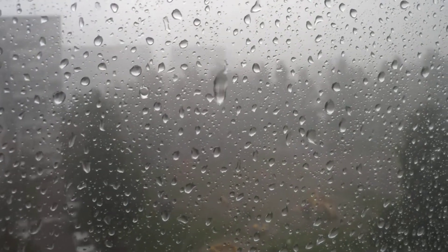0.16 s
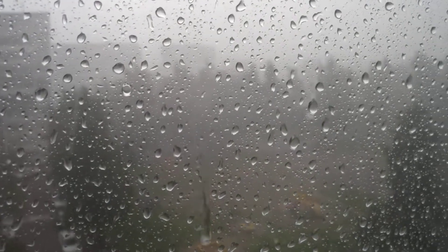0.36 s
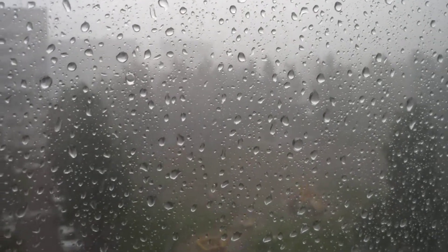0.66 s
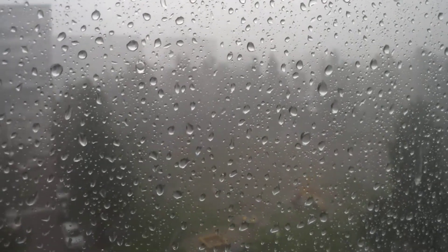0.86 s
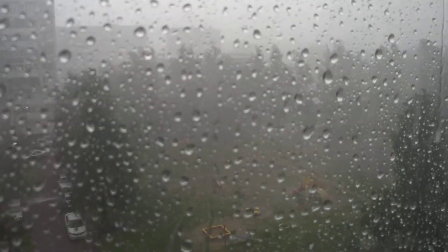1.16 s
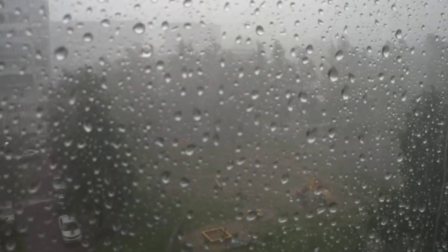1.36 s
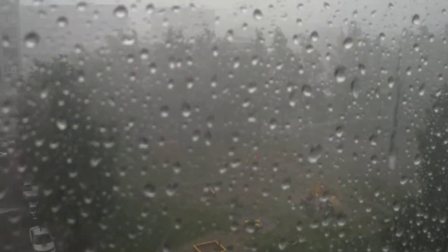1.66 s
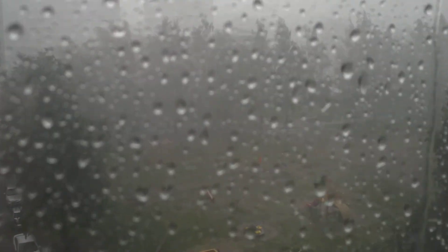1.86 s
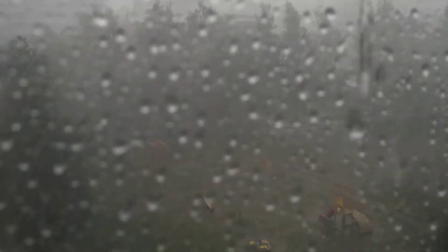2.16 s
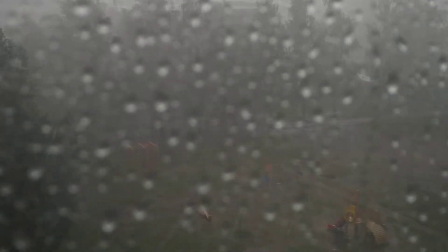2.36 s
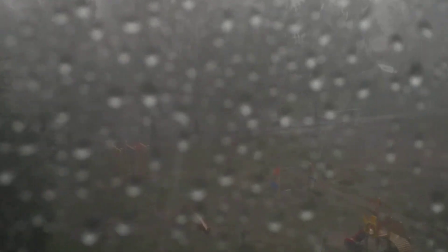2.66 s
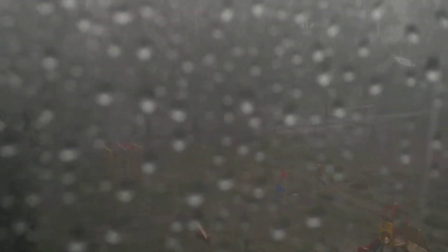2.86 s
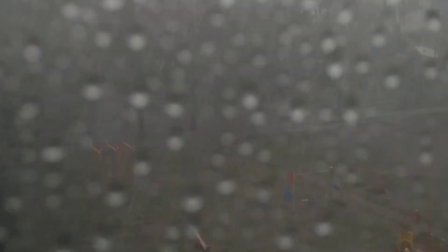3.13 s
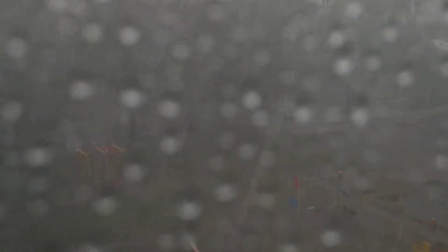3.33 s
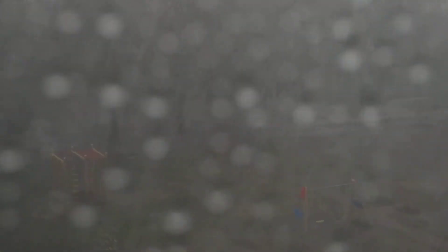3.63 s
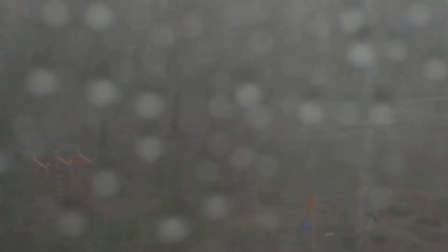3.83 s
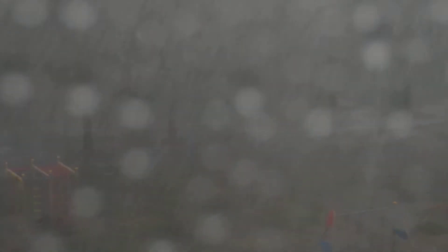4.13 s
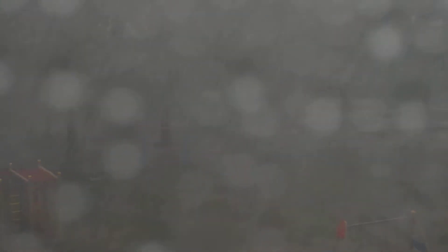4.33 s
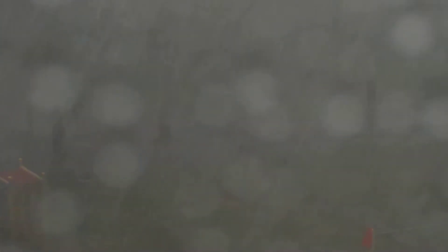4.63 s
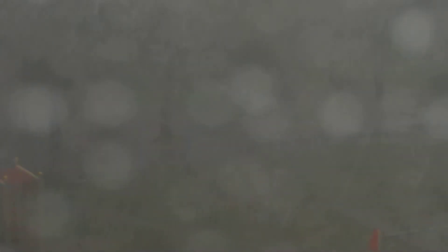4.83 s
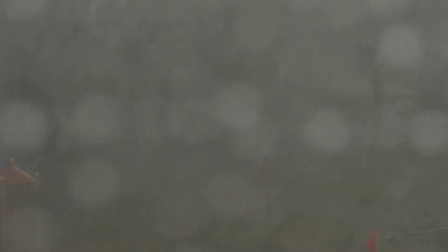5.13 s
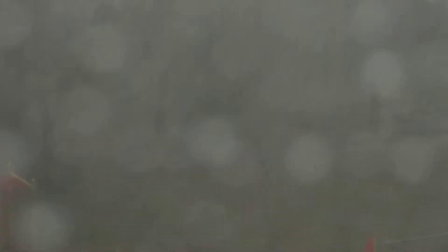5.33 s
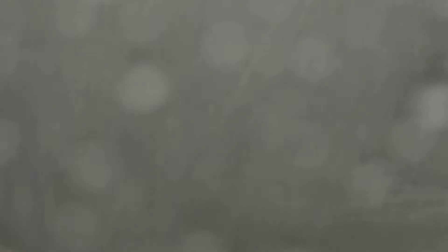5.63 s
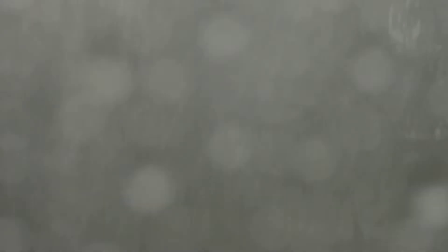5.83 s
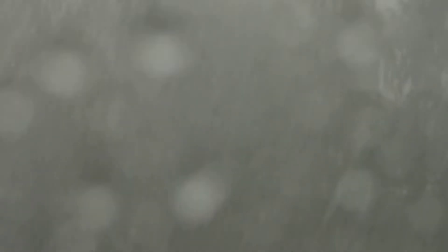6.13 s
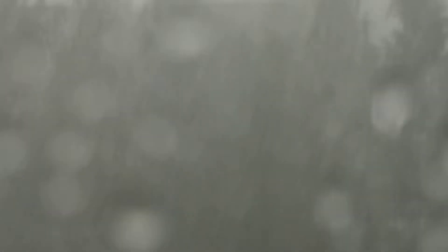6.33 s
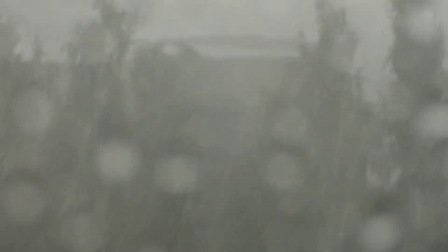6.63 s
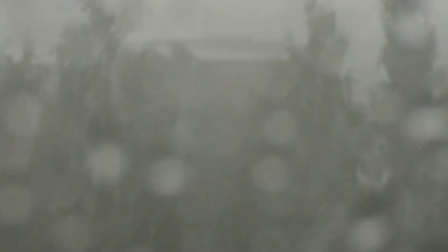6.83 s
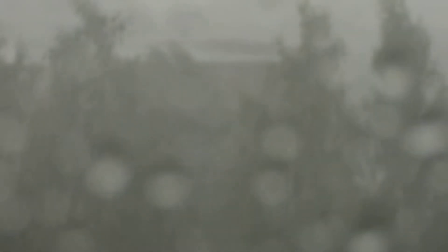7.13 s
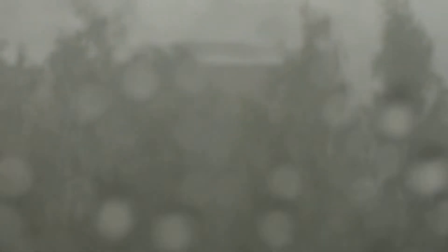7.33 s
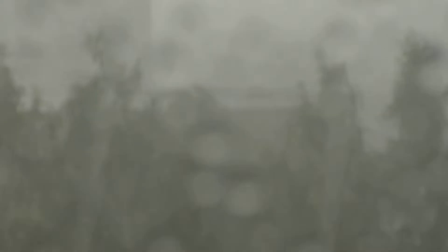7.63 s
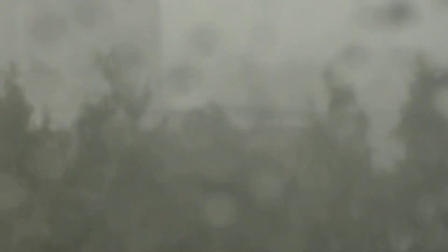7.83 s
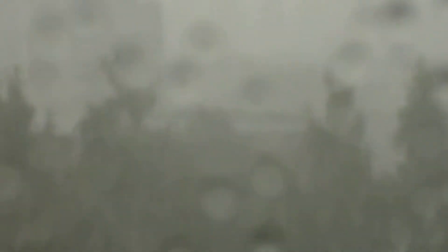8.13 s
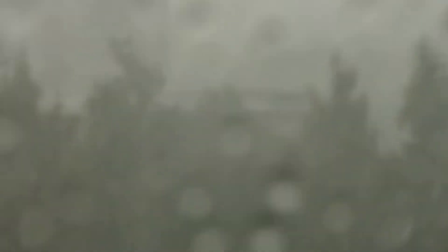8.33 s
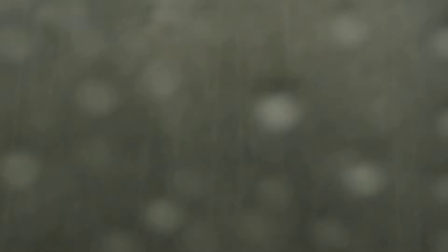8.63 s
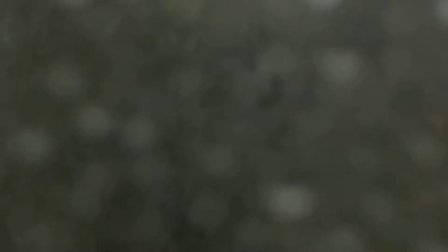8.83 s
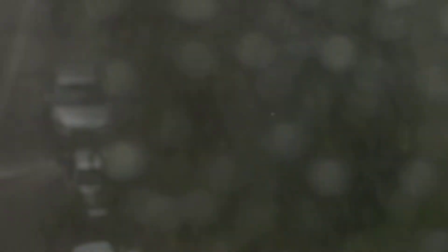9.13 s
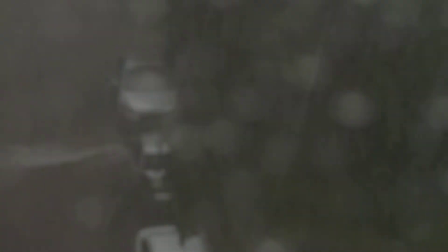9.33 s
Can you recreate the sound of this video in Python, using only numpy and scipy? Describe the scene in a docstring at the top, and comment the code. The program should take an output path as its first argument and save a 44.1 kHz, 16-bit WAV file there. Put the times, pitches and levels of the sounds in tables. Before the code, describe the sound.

Close indoor view of a storm through a closed window. A few dry hard clicks sit beside the microphone at the start, then heavy drops drum on the metal sill, growing denser. Hailstones tick and crack on the glass, two very hard ones just after three seconds rattling the pane. Downpour hiss and low rumble stay behind.

```python
"""Heavy drops and gusty patter drum on a metal sill below a closed window, each exciting its modes.
Hailstones crack on the glass as noise bursts through its resonances; blows make the pane boom and rattle.
Behind lie the hiss of the downpour and a low rumble, both coloured noise, and the hum of the pane.
Dry clicks sound beside the microphone early on; the level dips briefly around them.
The stereo image narrows to mono for a few seconds, then partly reopens."""
import sys
import numpy as np
from scipy import signal
from scipy.fft import rfft, irfft
from scipy.io import wavfile
from scipy.ndimage import uniform_filter1d

SR = 44100
rng = np.random.default_rng(int(sys.argv[2]) if len(sys.argv) > 2 else 0)


def write(x):
    x = np.atleast_2d(x).T
    wavfile.write(sys.argv[1], SR, np.round(np.clip(x, -1, 1) * 32767).astype(np.int16))


N = 418068
TIME = np.arange(N) / SR
ROOM_T60_S = 0.28

# All levels in the tables are relative; each source sets its own overall gain.
# drive of the gusts on the rain: [t/s, level/dB]
GUSTS = [(0.0, -42), (0.29, -45), (0.5, -54.5), (0.8, -62), (1.15, -60), (1.45, -44.5), (2.25, -53),
         (2.53, -40.5), (2.93, -54), (3.3, -48.5), (3.7, -43), (4.3, -46.5), (4.8, -43), (5.15, -46),
         (5.4, -39), (5.8, -42.5), (6.1, -47.5), (6.5, -45.5), (7.45, -41.5), (7.8, -48.5), (8.3, -35.5),
         (8.55, -41.5), (8.95, -35.5), (9.28, -45.5), (9.48, -34)]
# strength of the downpour: [t/s, level/dB]
RAINFALL = [(0.0, -68.5), (0.31, -60), (0.43, -57), (0.55, -80), (0.62, -73), (0.87, -69), (1.1, -63),
            (1.3, -56), (2.61, -53.5), (2.77, -55.5), (4.33, -52), (5.25, -58), (5.76, -57), (6.42, -59),
            (7.34, -56.5), (7.66, -60), (8.08, -57), (8.21, -55.5), (9.48, -59)]
# loudest hailstones on the glass: [t/s, level/dB, treble/dB]
HAIL_STRIKES = [(0.752, -45, -35), (0.966, -44.5, -4), (1.244, -55, 4), (1.367, -37, -7),
                (1.893, -45.5, -4.5), (2.3186, -34.5, -11), (2.3908, -35, -19), (2.409, -38, -17),
                (2.4259, -37, -14), (2.505, -43, -4.5), (2.556, -40.5, -13), (2.568, -46, -15),
                (2.582, -34, -27), (2.635, -29, -26), (2.677, -37, -17), (2.876, -53, 3),
                (3.2964, -16.5, -18), (3.3275, -13.5, -18), (3.6353, -41, -6), (3.954, -35.5, -6.5),
                (3.999, -38, -7.5), (4.031, -38, -5), (4.0926, -43, 0.5), (4.339, -48, -13),
                (4.38, -35.5, -14), (4.429, -37, -17), (4.5, -36.5, -26), (4.594, -32.5, -21),
                (4.606, -36, -13), (4.645, -45.5, -6), (4.877, -37, -6), (5.711, -34, -16),
                (5.848, -20, -14.5), (5.963, -26.5, -8), (6.123, -51, -1.5), (6.166, -39, -18),
                (6.302, -40, -20), (6.751, -37.5, -9), (7.02, -34.5, -23), (7.116, -30, -21),
                (7.2464, -34.5, -12), (7.2993, -52, 11), (8.025, -50.5, 1), (8.115, -32.5, -15),
                (8.139, -42, -7), (8.193, -38.5, -5), (8.2785, -28.5, -11), (8.347, -25.5, -38),
                (8.728, -38, -28.5), (8.8318, -20.5, -10.5), (8.948, -24.5, -18.5)]
# blows heavy enough to shake the pane: [t/s, boom/dB, clack/dB]
PANE_BLOWS = [(1.93, -45, -47), (2.718, -47, -51), (3.2974, -23.5, -6), (3.3279, -40, -9), (5.33, -41, -52),
              (5.85, -41.5, -19.5), (5.964, -45, -36), (7.118, -43.5, -39), (8.833, -40, -27)]
# vibration modes of the sheet metal sill: [f/Hz, level/dB, t60/s]
SILL_MODES = [(192.5, -4.5, 0.31), (215.2, -5.5, 0.51), (283.7, -1, 0.18), (296.7, -0.5, 0.17),
              (318.4, 2, 0.17), (359.7, -0.5, 0.12), (415.4, 0.5, 0.073), (448, 1.5, 0.11),
              (490, 1.5, 0.089), (513.2, 2.5, 0.11), (554, 2, 0.062), (631, 3.5, 0.068), (670.4, 6, 0.055),
              (740, 3.5, 0.028), (799, 1.5, 0.032), (884, -2, 0.083), (940, 2, 0.033), (1020, -0.5, 0.051),
              (1119, -8, 0.086), (1268, -9, 0.06), (1403, -7, 0.05), (1543, -5.5, 0.031),
              (1720, -5.5, 0.036), (1880, -10.5, 0.027), (2140, -10.5, 0.023)]
# spectrum of a dull knock: [f/Hz, level/dB]
KNOCK_SPECTRUM = [(60, -34), (150, -7), (300, -9), (550, -3.5), (1000, -9), (1700, -11), (3000, -31)]


def from_db(db):
    """Level and gain: 20 dB is a tenfold amplitude."""
    return 10 ** (np.asarray(db) / 20)


def rms_one(x):
    """Power normalisation: scale so that the first channel has rms 1."""
    return x / np.sqrt(np.mean(np.atleast_2d(x)[0] ** 2) + 1e-20)


def curve(rows):
    """Linear interpolation between (time, value) rows."""
    return np.interp(TIME, *np.transpose(rows))


def impulses(seconds, sizes):
    """Impulsive excitation: one single-sample click at each moment."""
    samples = np.clip(np.round(seconds * SR).astype(int), 0, N - 1)
    return np.bincount(samples, sizes, N)


def ring(x, hz, t60):
    """Damped oscillator: a unit click starts a decaying sine of initial height 1."""
    radius, angle = from_db(-60 / (t60 * SR)), 2 * np.pi * hz / SR
    feedback = [1, -2 * radius * np.cos(angle), radius * radius]
    return signal.lfilter([0, np.sin(angle)], feedback, x + 1e-18)


def resonance(x, hz, width_hz):
    """Forced resonance: a two-pole band-pass with gain 1 at its peak."""
    radius = np.exp(-np.pi * width_hz / SR)
    feedback = [1, -2 * radius * np.cos(2 * np.pi * hz / SR), radius * radius]
    return signal.lfilter([1, 0, -1], feedback, x + 1e-18) * (1 - radius * radius) / 2


def above(x, hz, order=1):
    """High-pass filtering: attenuate what lies below the corner frequency."""
    return signal.sosfilt(signal.butter(order, hz, "high", fs=SR, output="sos"), x + 1e-18)


def below(x, hz):
    """Low-pass filtering: attenuate what lies above the corner frequency."""
    return signal.sosfilt(signal.butter(2, hz, fs=SR, output="sos"), x)


def colour(x, points, size=2048):
    """Spectral shaping: a causal minimum-phase filter of unit energy."""
    hz, db = np.transpose(points)
    log_bins = np.log(np.fft.rfftfreq(size, 1 / SR) + 1)
    gain = from_db(np.interp(log_bins, np.log(hz), db))
    cepstrum = irfft(np.log(gain))
    # folding the cepstrum onto positive times gives minimum phase
    pulse = irfft(np.exp(rfft(2 * cepstrum[:size // 2], size)))
    return signal.oaconvolve(x, pulse[None] / np.linalg.norm(pulse), axes=1)[:, :N]


def bursts(clicks, t60, hold_s=0):
    """Incoherent addition: noise puffs that hold, then decay, add in power; rows are mid and side."""
    envelope = from_db(-60 * np.maximum(TIME[:SR // 2] - hold_s, 0) / t60)
    power = np.maximum(signal.oaconvolve(clicks ** 2, envelope ** 2)[:N], 0)
    return np.sqrt(power) * rng.standard_normal((2, N))


def room(x, t60, wet_db):
    """Reverberation: a diffuse tail builds up as the first reflections arrive, then decays."""
    t = TIME[:SR // 2]
    buildup = np.clip(t / .008 - .5, 0, 1)
    tail = rng.standard_normal((2, len(t))) * from_db(-60 * t / t60) * buildup
    wet = signal.oaconvolve(x, tail / np.linalg.norm(tail[0]), axes=1)[:, :x.shape[1]]
    return x + from_db(wet_db) * wet


def ports(pair, pan_db, apart_hz):
    """Spatial coherence: two close microphone ports hear bass alike and treble differently."""
    mid, side = pair[0], above(pair[1], apart_hz)
    lean = from_db(np.array([[.5], [-.5]]) * pan_db)  # positive: louder on the left
    return np.array([mid + side, mid - side]) * lean / lean.mean(axis=0)


def struck(blows, modes):
    """Modal superposition: a struck body is a sum of decaying modes, here in alternating signs."""
    return sum((-1) ** k * from_db(db) * ring(blows, hz, t60) for k, (hz, db, t60) in enumerate(modes))


def pings(clicks, low_hz, high_hz, cycles, count):
    """Local resonance: each impact takes one of several pitches and falls 60 dB in so many cycles."""
    at = np.flatnonzero(clicks)
    dealt, leaning = rng.integers(0, count, len(at)), rng.uniform(-2.7, 1, len(at))
    out = np.zeros((2, N))
    for k, hz in enumerate(np.geomspace(low_hz, high_hz, count)):
        sizes = clicks[at] * (dealt == k)
        mid_side = np.array([impulses(at / SR, sizes), impulses(at / SR, sizes * leaning)])
        out += ring(mid_side, hz, cycles / hz)
    return out


def shower(per_s, level_rows, level_db, spread_db):
    """Random arrivals: independent impacts with strengths scattered around a level curve."""
    when, chance = rng.random((4000, 2)).T
    seconds = when * N / SR
    db = np.interp(seconds, *np.transpose(level_rows)) + level_db
    db = db + spread_db * rng.standard_normal(len(seconds))
    lands = chance < per_s * N / SR / len(seconds)
    return seconds, lands * from_db(db)


def storm():
    """Broadband noise: the low rumble of the weather comes through the closed window."""
    # rumble: [t/s, level/dB]
    rumble_level = [(0, -64), (0.4, -51.5), (0.7, -65), (1.4, -53.5), (3, -54.5), (5, -54.5), (9.48, -56.5)]
    # its spectrum: [f/Hz, level/dB]
    rumble_spectrum = [(15, -28), (28, -19.5), (42, -6), (65, -9), (100, -12), (140, -2.5), (250, -1.5),
                       (800, -48.5)]
    noise = colour(rng.standard_normal((2, N)), rumble_spectrum, size=16384)
    return from_db(curve(rumble_level)) * rms_one(noise) * [[1], [.36]]  # mid, side


def downpour(level_db, grain_db):
    """Superposition of many sources: countless tiny impacts merge into a slightly grainy hiss."""
    # hiss spectrum: [f/Hz, level/dB]
    hiss_spectrum = [(200, 7.5), (900, 10), (2000, -3), (3500, 1), (4500, 0.5), (6800, 0), (9500, -3),
                     (13000, -7.5), (15000, -2.5), (16000, -19)]
    fluctuation = rms_one(uniform_filter1d(rng.standard_normal(N), size=200))
    noise = rng.standard_normal((2, N)) * from_db(grain_db * fluctuation)
    return from_db(curve(RAINFALL) + level_db) * rms_one(colour(noise, hiss_spectrum))


def pane_hum(hz, width_hz):
    """Random excitation of a resonator: the weather keeps the pane's main mode humming faintly."""
    # hum: [t/s, level/dB]
    hum_level = [(0, -66), (0.7, -66), (1.55, -59.5), (2.05, -52.5), (3.1, -57.5), (9.48, -56)]
    hum = resonance(rng.standard_normal(N), hz, width_hz)
    return from_db(curve(hum_level)) * rms_one(resonance(hum, hz, width_hz))


def close_clicks(level_db, t60, contact_db):
    """Direct sound alone: a hard contact, a brief rasp and a short ring, without reverberation."""
    # clicks beside the microphone: [t/s, level/dB, left-right/dB, low-pass f/Hz]
    click_rows = [(0.4253, -13, -4, 5500), (0.432, -7, -8, 13000), (0.4346, -5, -4, 15000),
                  (0.4358, -11.5, -10, 12000), (0.598, -48, -14, 11000), (0.636, -49.5, -15, 7000),
                  (0.683, -54, -15, 11000), (0.8898, -27, -2.5, 12000)]
    # spectrum of contact and rasp: [f/Hz, level/dB]
    click_spectrum = [(300, -31), (750, -15), (1000, -7.5), (1270, -3), (1900, -8.5), (3000, -13),
                      (4000, -8), (5200, -1), (7500, -7.5), (9700, -3), (12000, -8), (16000, -25.5)]
    # modes the clicks ring with: [f/Hz, level/dB, t60/s]
    click_modes = [(800, -31, 0.018), (1200, -23.5, 0.032), (1400, -21, 0.034), (6430, -12, 0.011),
                   (9900, -9.5, 0.0092)]
    out = np.zeros((2, N))
    for s, db, pan_db, top_hz in click_rows:
        strike = impulses(np.array([s]), from_db([db + level_db]))
        # each port hears a rasp of its own
        snap = colour(bursts(strike, t60) + from_db(contact_db) * strike, click_spectrum)
        snap = snap + struck(strike, click_modes)
        out += below(snap, top_hz) * from_db([[pan_db / 2], [-pan_db / 2]])
    return out


def pellets(level_db, spread_db, gust_share, count):
    """Random impacts: small ice grains tick, harder when the downpour is and in the gusts."""
    seconds = rng.uniform(0, N / SR, count)
    gust_db = np.interp(seconds, *np.transpose(GUSTS))
    size_db = np.interp(seconds, *np.transpose(RAINFALL)) + gust_share * (gust_db - gust_db.mean())
    size_db = size_db + spread_db * np.minimum(rng.exponential(1, count), 3)
    grains = impulses(seconds, from_db(size_db + level_db))
    return pings(grains, low_hz=2480, high_hz=10900, cycles=18, count=14)


def pane(clack_ring_db, rattle_hz, width_hz, rattle_t60, thud_db, thud_t60, stone_thud_db):
    """Plate bending: big blows excite low modes and a rattle in the frame; every loud stone thuds."""
    # bending modes of the pane: [f/Hz, level/dB, t60/s]
    pane_modes = [(75.4, -23, 0.066), (152.4, -6, 0.72), (189, -12.5, 0.25), (207, -9, 0.2),
                  (311, -4.5, 0.23), (359, -7.5, 0.19), (446.4, -11, 0.36), (487, -11, 0.23),
                  (587, -17, 0.12), (640, -13.5, 0.14), (847, -8, 0.09), (976, -15.5, 0.27)]
    # modes of the clack in the frame: [f/Hz, level/dB, t60/s]
    frame_modes = [(2600, -10, 0.13), (2900, -6, 0.09), (3430, -23, 0.07), (3410, -4, 0.044),
                   (3590, -7, 0.14), (3690, -6.5, 0.11), (3860, -13, 0.1), (4240, -18, 0.047)]
    seconds, boom_db, clack_db = np.transpose(PANE_BLOWS)
    stone_s, stone_db, _ = np.transpose(HAIL_STRIKES)
    blows, clacks = impulses(seconds, from_db(boom_db)), impulses(seconds, from_db(clack_db))
    rings = struck(blows, pane_modes) + from_db(clack_ring_db) * struck(clacks, frame_modes)
    thuds = from_db(thud_db) * blows + impulses(stone_s, from_db(stone_db + stone_thud_db))
    thud = colour(bursts(thuds, thud_t60), KNOCK_SPECTRUM)
    rattle = resonance(bursts(clacks, rattle_t60), rattle_hz, width_hz)
    return rings + thud + rattle  # the rings enter mid and side alike


def shatter(strikes, t60):
    """Fracture noise and reflection: a crumbling stone, its far-wall echo and its diffuse tail."""
    echo_s, echo_db = 0.023, -14.5
    hold_s, tail_db, tail_t60 = 0.003, -11.5, 0.31
    echoes = np.pad(strikes, (int(echo_s * SR), 0))[:N]
    crumbling = bursts(strikes + from_db(echo_db) * echoes, t60, hold_s)
    return crumbling + from_db(tail_db) * bursts(strikes, tail_t60)


def hailstones(level_db, t60, treble_hz, neutral_db, contact_db):
    """Impact and fracture: ice strikes with a hard tick and shatters, with a treble of its own."""
    seconds, stone_db, treble_db = np.transpose(HAIL_STRIKES)
    # small stones fall at random; their level is relative to the rainfall curve
    small = impulses(*shower(per_s=18, level_rows=RAINFALL, level_db=8, spread_db=0.5))
    strikes = impulses(seconds, from_db(stone_db)) + small
    contact = from_db(contact_db) * strikes * [[1], [0]]  # mid only
    crack = below(shatter(strikes, t60) + contact, treble_hz)
    shattered = impulses(seconds, from_db(stone_db + treble_db - neutral_db)) + small
    treble = above(shatter(shattered, t60), treble_hz, order=2)
    return from_db(level_db) * (crack + treble)


def shards(level_db, t60):
    """Fragmentation noise: the biggest stones burst and their splinters skitter over the glass."""
    seconds, _, clack_db = np.transpose(PANE_BLOWS)
    return bursts(impulses(seconds, from_db(clack_db + level_db)), t60)


def glass(cracks, ring_db):
    """Resonant filtering: each crack of ice sets the high modes of the glass ringing."""
    # crack spectrum: [f/Hz, level/dB]
    crack_spectrum = [(200, -18), (700, 13), (1400, 0), (2100, 1.5), (3500, 3), (6000, -2), (8000, -7),
                      (12000, -8), (16000, -23)]
    # high resonances of the glass: [f/Hz, bandwidth/Hz, level/dB]
    glass_modes = [(1220, 250, -10.5), (2533, 18, 1.5), (2773, 34, 0.5), (2980, 56, -2), (3250, 41, -15),
                   (3800, 80, -9.5), (4090, 150, -3), (4510, 170, -6.5), (5240, 260, 0.5), (5630, 370, -4),
                   (7140, 1270, 2), (8170, 420, -1.5), (9050, 790, -5)]
    strike = colour(cracks, crack_spectrum)
    rings = sum(from_db(db + ring_db) * resonance(strike, hz, width) for hz, width, db in glass_modes)
    return strike + rings


def splashes(landings, level_db, t60):
    """Spray noise: the water of each drop flies off with a faint tick."""
    # spray spectrum: [f/Hz, level/dB]
    spray_spectrum = [(200, -15.5), (800, 13), (1600, -1.5), (2200, 3.5), (3500, 1.5), (8000, -20),
                      (16000, -22.5)]
    return from_db(level_db) * colour(bursts(landings, t60), spray_spectrum)


def drop_knocks(landings, level_db, t60):
    """Contact noise: each drop meets the sill with a short, dry knock."""
    return from_db(level_db) * colour(bursts(landings, t60), KNOCK_SPECTRUM)


def plips(cycles):
    """Local modes: drops draw short clear notes from small patches of the sheet."""
    # notes: [t/s, f/Hz, level/dB]
    notes = [(4.735, 1470, -44), (5.322, 1814, -44), (5.579, 1750, -47), (6.653, 1800, -44),
             (8.117, 1700, -35.5), (8.171, 1560, -47), (8.307, 1540, -40), (8.347, 1560, -36)]
    rings = sum(ring(impulses(np.array([s]), from_db([db])), hz, cycles / hz) for s, hz, db in notes)
    return rings * [[1], [0]]  # mid only


def tap(modes, pitch_hz, hardness_db):
    """Position-dependent excitation: a landing point favours modes near one pitch, signs at random."""
    travel_s, focus_db, focus_octaves = 0.009, 7, 0.17
    out = np.zeros((2, modes.shape[1]))
    for (hz, _, _), mode in zip(SILL_MODES, modes):
        travel = int(rng.random() * travel_s * SR)  # bending waves reach the frame a little apart
        focus = np.exp(-(np.log2(hz / pitch_hz) / focus_octaves) ** 2)
        db = focus_db * focus + hardness_db * (hz > 1080)
        out[:, travel:] += rng.choice([-1, 1], (2, 1)) * from_db(db) * mode[:len(mode) - travel]
    out = room(out, ROOM_T60_S, wet_db=-4)
    return out * np.linalg.norm(modes) / np.linalg.norm(out[0])


def sill(drop_db, count):
    """Modal response to impacts: drumming of heavy drops and patter, with their landings and spray."""
    # heaviest drops: [t/s, level/dB, pitch f/Hz, brightness/dB]
    drop_rows = [(0.146, -28.5, 674, -20), (0.167, -33.5, 686, -22), (0.233, -34, 312, -18.5),
                 (0.341, -32.5, 510, -17), (0.555, -39.5, 650, -16), (0.591, -39.5, 660, -7.5),
                 (0.682, -40.5, 457, -15.5), (0.865, -39, 350, -16.5), (0.928, -38, 333, -12.5),
                 (1.155, -34.5, 280, -24), (1.196, -36.5, 660, -21), (1.216, -31, 510, -23),
                 (1.285, -33, 660, -20), (1.304, -29.5, 302, -25), (1.353, -33, 325, -14.5),
                 (1.371, -37, 320, -14), (1.408, -38, 500, -16), (1.454, -35, 296, -15),
                 (1.622, -31.5, 526, -25), (1.718, -30.5, 670, -22.5), (1.762, -33.5, 325, -20.5),
                 (1.898, -28, 533, -26), (1.988, -32, 620, -19), (2.149, -36, 330, -20),
                 (2.172, -28, 312, -29), (2.316, -24, 506, -19), (2.391, -27.5, 680, -21),
                 (2.426, -29, 655, -23), (2.456, -29, 494, -17), (2.527, -27.5, 323, -20),
                 (2.564, -29, 600, -20), (2.597, -30, 670, -24), (2.663, -29.5, 312, -22),
                 (2.713, -26.5, 640, -21), (2.763, -34.5, 470, -21), (2.874, -30, 620, -26),
                 (2.991, -37, 570, -24), (3.015, -39, 302, -18), (3.225, -40.5, 510, -7),
                 (3.378, -31, 310, -17), (3.397, -34, 320, -12), (3.432, -32.5, 300, -15),
                 (3.478, -32.5, 600, -8), (3.511, -33.5, 460, -19), (3.533, -41, 470, -13),
                 (3.649, -31.5, 677, -17), (3.687, -34, 296, -20), (3.769, -32, 533, -16),
                 (3.834, -33, 660, -22), (3.901, -25, 304, -16), (3.975, -31, 297, -15),
                 (3.995, -36, 580, -15), (4.019, -30, 476, -18), (4.031, -28.5, 500, -20),
                 (4.075, -35, 490, -10), (4.161, -33.5, 670, -10), (4.237, -33.5, 446, -18),
                 (4.29, -32.5, 520, -21), (4.359, -32.5, 320, -23), (4.425, -27, 510, -24),
                 (4.517, -25, 274, -17), (4.548, -31, 320, -18), (4.604, -25, 320, -17.5),
                 (4.631, -26.5, 464, -22), (4.684, -31, 494, -18), (4.726, -26, 670, -25),
                 (4.764, -23.5, 302, -19), (4.792, -32.5, 430, -13), (4.823, -22.5, 660, -13.5),
                 (4.848, -26, 466, -16), (4.874, -28, 700, -14), (4.946, -23, 300, -14.5),
                 (4.988, -24, 466, -19), (5.013, -40, 497, -19), (5.038, -29, 1020, -17),
                 (5.082, -32.5, 510, -9), (5.107, -28.5, 523, -18), (5.227, -22.5, 445, -15.5),
                 (5.317, -28.5, 940, -17), (5.462, -31.5, 318, -11), (5.503, -38, 526, -6),
                 (5.556, -29.5, 650, -13), (5.575, -33.5, 517, -3), (5.624, -26.5, 298, -13),
                 (5.672, -34, 680, -7), (5.708, -25.5, 654, -14), (5.774, -29, 460, -13),
                 (5.799, -34, 473, -13), (5.818, -32.5, 686, -16), (5.856, -25, 322, -11.5),
                 (5.879, -27.5, 485, -18), (5.971, -28.5, 695, -12), (6.048, -34.5, 513, -18),
                 (6.206, -37, 655, -14), (6.289, -28, 510, -16), (6.361, -30, 536, -21),
                 (6.552, -31, 290, -18), (6.591, -28, 665, -19), (6.627, -27, 320, -17),
                 (6.658, -32.5, 537, -11), (6.674, -34, 313, -27), (6.799, -38, 300, -7),
                 (6.838, -30.5, 520, -20), (6.867, -34, 280, -9), (6.924, -29, 490, -17),
                 (6.957, -38.5, 475, -5), (7.019, -30, 674, -8), (7.125, -24, 650, -14.5),
                 (7.205, -28, 316, -11), (7.255, -32, 670, -12), (7.293, -26.5, 510, -26),
                 (7.326, -34, 500, -13), (7.369, -33, 510, -12), (7.443, -33, 320, -16),
                 (7.466, -22.5, 580, -14), (7.569, -22.5, 320, -17), (7.723, -33.5, 526, -16),
                 (7.767, -24, 330, -20), (7.831, -26.5, 317, -18), (7.863, -33, 525, -13),
                 (7.938, -29, 457, -21), (7.971, -26.5, 520, -18), (8.045, -25.5, 670, -15),
                 (8.079, -27, 490, -23), (8.144, -28.5, 656, -17), (8.172, -26.5, 670, -14),
                 (8.201, -27, 490, -10), (8.266, -19, 660, -12.5), (8.321, -24.5, 530, -21),
                 (8.346, -28.5, 310, -8), (8.37, -22, 530, -15.5), (8.402, -25.5, 302, -12),
                 (8.517, -27.5, 676, -18), (8.545, -18.5, 500, -16), (8.623, -28.5, 320, -11),
                 (8.733, -27, 540, -10), (8.799, -20, 328, -14.5), (8.885, -23.5, 670, -13),
                 (8.912, -21.5, 630, -15), (8.977, -32, 310, -17), (9.023, -20.5, 303, -18),
                 (9.147, -35, 285, -6), (9.211, -32, 460, -22), (9.249, -28.5, 310, -17),
                 (9.351, -24.5, 465, -16), (9.375, -26.5, 550, -9)]
    hardness_share = 0.94  # share of the brightness passed to the upper modes
    blow = signal.unit_impulse(SR // 2)
    modes = np.array([from_db(db) * ring(blow, hz, t60) for hz, db, t60 in SILL_MODES])
    heavy_s, heavy_db, pitch_hz, bright_db = np.transpose(drop_rows)
    heavy_db, bright_db = heavy_db + drop_db, bright_db - bright_db.mean()
    # lighter drops fall at random; their level is relative to the gusts
    light_s, light_sizes = shower(per_s=130, level_rows=GUSTS, level_db=-14, spread_db=2)
    spots = [tap(modes, hz, 0) for hz in np.geomspace(pitch_hz.min(), pitch_hz.max(), count)]
    # each heavy drop has its own landing point, the patter shares the spots
    taps = [tap(modes, hz, hardness_share * db) for hz, db in zip(pitch_hz, bright_db)]
    taps += [spots[k] for k in rng.integers(0, count, len(light_s))]
    seconds, sizes = np.r_[heavy_s, light_s], np.r_[from_db(heavy_db), light_sizes]
    drumming = np.zeros((2, N + SR))
    for k in np.flatnonzero(sizes):
        start = int(seconds[k] * SR)
        drumming[:, start:start + len(blow)] += sizes[k] * taps[k]
    spray_sizes = np.r_[from_db(heavy_db + bright_db), light_sizes]
    return drumming[:, :N], impulses(seconds, sizes), impulses(seconds, spray_sizes)


def narrowed(x):
    """Mid-side stereo: scaling the difference signal closes and reopens the image."""
    # stereo image: [t/s, width/1], 0 is mono
    image_width = [(0.1, 0.85), (0.9, 0.22), (1.25, 0), (4.6, 0), (4.75, 0.6)]
    mid, side = (x[0] + x[1]) / 2, (x[0] - x[1]) / 2 * curve(image_width)
    return np.array([mid + side, mid - side])


def scene():
    """Linear superposition of weather, pane, hail and sill; the clicks stay outside the narrowing."""
    out = ports(storm(), pan_db=2.0, apart_hz=11.5)
    out += ports(downpour(level_db=-1.5, grain_db=1.0), pan_db=-2.5, apart_hz=2500)

    knocks = pane(clack_ring_db=-20.5, rattle_hz=3600, width_hz=370, rattle_t60=0.045,
                  thud_db=-22, thud_t60=0.12, stone_thud_db=-22)
    out += ports(knocks, pan_db=-3, apart_hz=3000) + pane_hum(hz=153.15, width_hz=12.5)

    ice = hailstones(level_db=-14.5, t60=0.035, treble_hz=7800, neutral_db=-15.5, contact_db=-1)
    ice = ice + shards(level_db=-35.5, t60=0.27)
    ticks = room(pellets(level_db=0, spread_db=3.0, gust_share=0.74, count=600), t60=0.15, wet_db=-2.5)
    out += ports(glass(ice, ring_db=1.5) + ticks, pan_db=-6, apart_hz=2800)

    drumming, landings, sprays = sill(drop_db=-18.0, count=32)
    # small patches of the sheet ring on their own
    plinks = from_db(-11.0) * pings(sprays, low_hz=870, high_hz=2100, cycles=19, count=12)
    spray = plinks + plips(cycles=35) + splashes(sprays, level_db=-12.5, t60=0.11)
    spray = room(spray, ROOM_T60_S, wet_db=-1)
    drops = drumming + drop_knocks(landings, level_db=-21.5, t60=0.045) + spray
    out += ports(drops, pan_db=0.5, apart_hz=2000)
    return narrowed(out) + close_clicks(level_db=-5, t60=0.0093, contact_db=-4)


def record(dry):
    """Saturation and band limiting: peaks are rounded, the level dips briefly, the top is cut."""
    # level over time: [t/s, gain/dB]
    level_dip = [(0.44, 1), (0.45, -11.5), (0.55, -3.5), (0.7, 3.5)]
    rounded = .72 * np.tanh(dry / .72)
    low_pass = signal.ellip(10, .1, 80, 16100, fs=SR, output="sos")  # cutoff in Hz
    return signal.sosfilt(low_pass, rounded * from_db(curve(level_dip)))


dry = scene()
out = record(dry)
write(out)
```